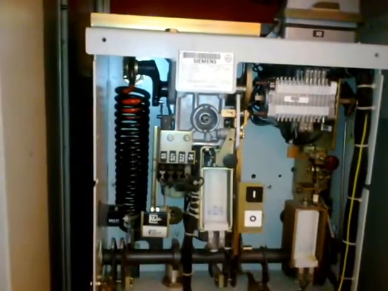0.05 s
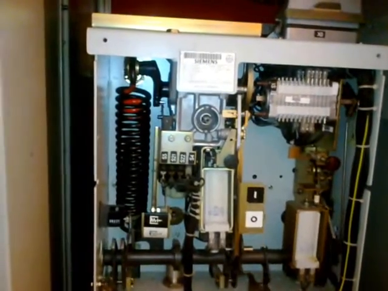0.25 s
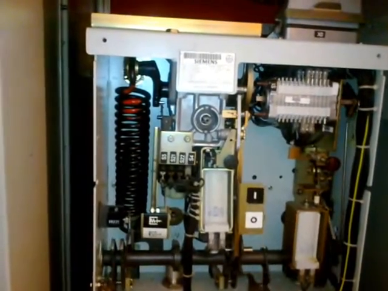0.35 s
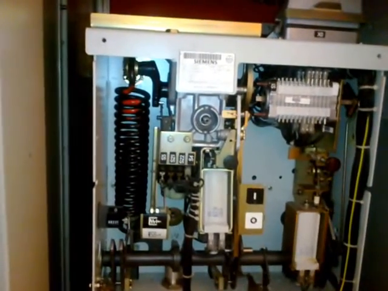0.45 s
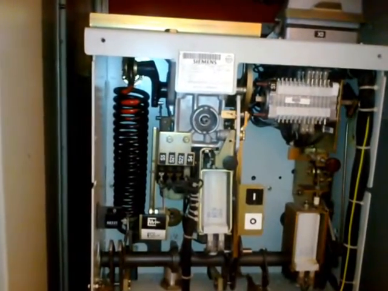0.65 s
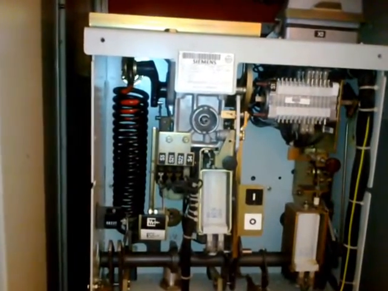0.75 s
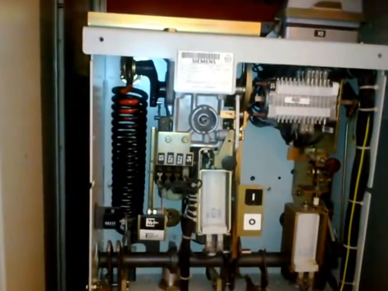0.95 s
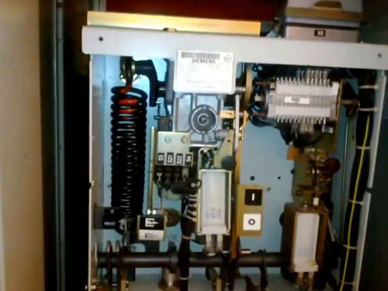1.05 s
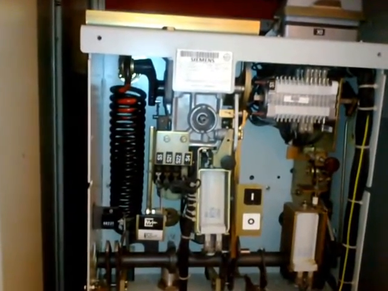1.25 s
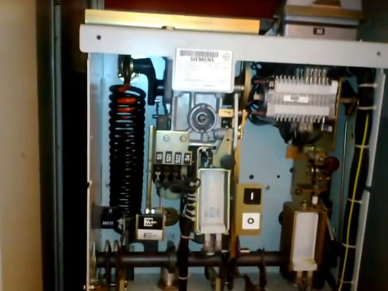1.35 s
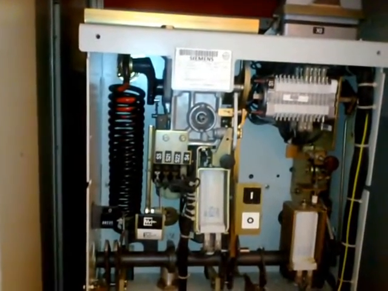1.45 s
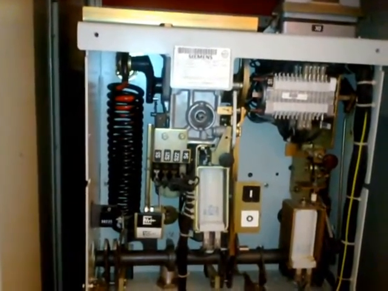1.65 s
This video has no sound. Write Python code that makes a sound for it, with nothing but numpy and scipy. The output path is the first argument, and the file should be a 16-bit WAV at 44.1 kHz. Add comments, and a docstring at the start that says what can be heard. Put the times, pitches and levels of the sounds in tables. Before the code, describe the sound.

One sharp, heavy clunk comes from a circuit breaker snapping shut, slightly overloading the close microphone. Small parts chatter and steel panels ring, then the hard-walled room's echo dies away over a faint hum from the coil spring.

```python
"""Circuit breaker slamming shut

A spring-driven breaker closes once in a quiet, hard-walled switchgear room. The latch lets go,
the linkage slams home and rebounds, and loose parts chatter. Steel panels ring, the cabinet thumps,
and the big coil spring hums on under the room's echo. The close microphone overloads on the slam."""
import sys
import numpy as np
from scipy import signal
from scipy.fft import rfft, irfft
from scipy.io import wavfile
from scipy.ndimage import uniform_filter1d

SR = 44100
rng = np.random.default_rng(int(sys.argv[2]) if len(sys.argv) > 2 else 0)


def master(y):
    """Save y as 16-bit WAV."""
    cut = np.clip(np.atleast_2d(y).T, -1, 1)
    pcm = np.round(cut * 32767)  # scale
    wavfile.write(sys.argv[1], SR, pcm.astype(np.int16))


N = 74970
SLAM_S = 0.211

# ring of a small loose part: freq_hz, relative_density_db, t60_s
SMALL_PART = [(500, -19, .2), (3000, -5, .3), (7010, 0, .3), (11000, -2.5, 0.31), (16000, -14.5, .2)]


def undb(db):
    return 10 ** (np.asarray(db) / 20)


def since(start_s):
    """Seconds since a moment, zero before it."""
    return np.maximum(np.arange(N) / SR - start_s, 0)


def fade(t, t60_s):
    """Exponential decay that loses 60 dB in t60_s."""
    return np.exp(-np.log(1000) * t / t60_s)


def delay(sound, start_s):
    """Moves a sound to its starting time."""
    return np.concatenate([np.zeros(int(start_s * SR)), sound])[:N]


def wander(per_s):
    """Smooth random drift with a spread near 1."""
    hold = int(SR / per_s)
    steps = np.repeat(rng.standard_normal(256), hold)[:N]
    return 1.3 * uniform_filter1d(uniform_filter1d(steps, hold), hold)


def curve(table, hz, column):
    """A table column, interpolated along log frequency."""
    rows = np.array(table, float)
    return np.interp(np.log(hz), np.log(rows[:, 0]), rows[:, column])


def noise_spectrum(table, tilt_db=0, ripple_db=0, ripple_step_hz=44.98):
    """Unit-level noise in the table's colour, with optional treble tilt and fine peaks and dips."""
    hz = np.maximum(np.fft.rfftfreq(N, 1 / SR), 1)
    ripple = np.interp(hz / ripple_step_hz, np.arange(1000), rng.standard_normal(1000))
    ripple *= np.minimum(hz / 2500, 1)
    treble_octaves = np.log2(np.maximum(hz / 2000, 1))
    db = curve(table, hz, column=1) + tilt_db * treble_octaves + ripple_db * ripple
    gain = undb(db) * hz ** 2 / (hz ** 2 + 20 ** 2)  # 20 Hz low cut
    return hz, rfft(rng.standard_normal(N)) * gain / np.sqrt(np.mean(gain ** 2))


def dense_ring(table, tilt_db=0, ripple_db=0, bands=5):
    """Countless modes as overlapping noise bands, each dying away at its own rate."""
    hz, spectrum = noise_spectrum(table, tilt_db, ripple_db)
    centres_hz = np.geomspace(table[0][0], table[-1][0], bands)
    position = np.interp(np.log(hz), np.log(centres_hz), np.arange(bands))
    t, ring = since(0), 0
    for band, t60_s in enumerate(curve(table, centres_hz, column=2)):
        share = np.maximum(1 - np.abs(position - band), 0)
        ring += irfft(spectrum * share, N) * fade(t, t60_s)
    return ring


def modes(table, start_s, build_s, waver_depth=0.55, waver_per_s=8):
    """Struck modes that swell, then waver at random as they decay."""
    t, ring = since(start_s), 0
    for hz, db, t60_s in table:
        phasor = np.exp(2j * np.pi * rng.random())
        phasor += waver_depth * (wander(waver_per_s) + 1j * wander(waver_per_s))
        ring += undb(db) * fade(t, t60_s) * np.imag(phasor * np.exp(2j * np.pi * hz * t))
    swell = 1 - np.exp(-t / build_s)
    return np.sqrt(2 / (1 + 2 * waver_depth ** 2)) * swell * ring


def swing(start_s, hz, gain_db, t60_s, build_s):
    """A damped sine that builds up from rest."""
    t = since(start_s)
    return undb(gain_db) * np.sin(2 * np.pi * hz * t) * fade(t, t60_s) * (1 - np.exp(-t / build_s))


def room_tone():
    """A bed of steady room noise, and a dull drone that dies away as the breaker closes."""
    # steady air: freq_hz, relative_density_db
    air = [(25, -2.5), (100, -3.5), (200, 0.5), (300, -13), (600, -15.5), (1100, -22), (1800, -34),
           (2700, -36.5), (3400, -35.5), (4300, -38.5), (5200, -46), (6000, -45.5), (6400, -39),
           (7000, -50.5), (8500, -50.5), (15000, -53)]
    # fading drone: freq_hz, relative_density_db, t60_s
    drone = [(60, -17.5, 2), (150, -7, 2), (214, 3.5, 2), (290, -16, 2), (454.3, -11.5, 2.1),
             (1050, -13.5, 1), (1600, -32.5, 0.66), (3800, -31.5, .8), (7000, -39.5, .8), (15000, -56, .8)]
    _, air_spectrum = noise_spectrum(air)
    return undb(-49.5) * irfft(air_spectrum, N) + undb(-41.5) * dense_ring(drone)


def ticks():
    """Small parts tick faintly, once before the slam and twice after."""
    # light taps: start_s, level_db
    taps = [(0.108, -62), (0.675, -63), (0.797, -67)]
    return sum(undb(db) * delay(dense_ring(SMALL_PART), start_s) for start_s, db in taps)


def linkage():
    """Latch, slam and rebounds: each blow is a short steel clash, and the levers clang home."""
    # blows of the mechanism: start_s, level_db, treble_tilt_db_per_octave
    blows = [(0.191, -25.5, 4), (0.1944, -17, 4), (0.1995, -15.5, 0.5), (0.2029, -10, 2), (0.2065, 2, 1.5),
             (0.2105, 0.5, 0.5), (0.2155, 4.5, -2), (0.222, 0, -4.5), (0.229, -11.5, 1.5), (0.24, -11.5, 0),
             (0.26, -17, 1.5)]
    # steel on steel: freq_hz, relative_density_db, t60_s
    clash = [(100, -3, 0.18), (300, -3.5, 0.094), (795, -6, 0.07), (1300, -2.5, 0.099), (1900, -5, 0.073),
             (2600, -0.5, 0.043), (4970, -7.5, .09), (11000, -11, .1), (15980, -21.5, .08)]
    # modes of the levers and shaft: pitch_hz, relative_level_db, t60_s
    levers = [(371.5, -5, .1), (546.7, -5, 0.15), (1131, -6, .11), (1273, -3.5, 0.14), (1501, -6, .11),
              (1586, -6, .1), (1767, -5.5, .1), (1997, -2.5, 0.09), (2253, 0, 0.064), (2306, 0.5, 0.14),
              (2480, -5.5, .1), (2880, -6.5, .1), (3122, -5, .11), (4338, -9.5, 0.13)]
    clashes = sum(undb(db) * delay(dense_ring(clash, tilt), start_s) for start_s, db, tilt in blows)
    return clashes + undb(-2) * modes(levers, start_s=0.2085, build_s=0.0043)


def room_echo(build_s=0.016):
    """The hard walls answer the slam with a diffuse, steely tail; the treble dies first."""
    # reverb tail: freq_hz, relative_density_db, t60_s
    room = [(30, 0, 1.8), (140, 5, 1.6), (300, -5.5, 1.78), (550.4, -1.5, 1.43), (832, -6, 1.3),
            (1466, -1.5, 1.27), (2000, -10.5, 1.106), (3514, -8, 0.96), (4460, -9.5, .87),
            (5400, -13.5, 0.85), (7200, -12, 0.71), (8900, -15, 0.62), (11700, -12.5, 0.48),
            (16000, -24.5, .35)]
    tail = dense_ring(room, ripple_db=2.5, bands=24)
    swell = 1 - np.exp(-since(0) / build_s)
    return undb(-10) * delay(tail * swell, start_s=0.208)


def rattle(hits_per_s=350, scatter_db=4.5):
    """Loose parts chatter at random after the slam and settle."""
    t = since(0)
    hits = (rng.random(N) < hits_per_s / SR) * undb(scatter_db * rng.standard_normal(N))
    click = dense_ring(SMALL_PART) * fade(t, t60_s=0.011)
    chatter = signal.fftconvolve(hits, click)[:N]
    return undb(-23) * delay(chatter / chatter.std() * fade(t, t60_s=0.35), SLAM_S)


def panel_ring():
    """The slam sets the steel panels ringing for about a second."""
    # panel modes: pitch_hz, level_db, t60_s
    panels = [(370, -30, .7), (547, -24, .7), (582.5, -25.5, 0.93), (676, -29.5, .9), (1002, -28.5, 0.94),
              (1053, -31.5, 0.66), (1272, -24, .85), (1308, -26.5, .6), (1398, -23.5, .9), (1467, -29.5, 1),
              (1524, -30, 1), (3196, -35, 1), (3320, -34.5, .7), (4410, -36, .7)]
    return modes(panels, SLAM_S, build_s=0.015)


def cabinet_boom():
    """The jolted cabinet rings low, thumps and pushes out a sub-bass puff of air."""
    # cabinet modes: pitch_hz, level_db, t60_s
    cabinet = [(43, -26, 2.4), (73.9, -27.5, 1.3), (138.5, -17, 0.78), (193, -27.5, 1.3),
               (267.7, -29.5, 1.6)]
    ring = modes(cabinet, SLAM_S, build_s=0.034)
    thump = swing(start_s=0.224, hz=132, gain_db=17, t60_s=0.04, build_s=0.02)
    air_push = swing(start_s=0.2372, hz=16, gain_db=0, t60_s=0.11, build_s=0.002)
    return ring + thump + air_push


def spring_hum():
    """The coil spring hums on: nearly harmonic low modes with faint wire tones above."""
    # spring modes: pitch_hz, level_db, t60_s
    spring = [(46.5, -40, 4.8), (94.2, -41, 9.7), (139.3, -41, 9), (186, -46.5, 8), (197.7, -45.5, 7.6),
              (341, -55, 6), (840, -59, 5), (1210, -60, 5), (1400, -62, 4), (3194, -77, 6),
              (4151, -74, 8.8), (6282, -79, 6), (6600, -82, 4.2)]
    return modes(spring, SLAM_S, build_s=0.034)


def scene():
    """One closing of the breaker over the room tone, in mono."""
    mix = room_tone() + ticks() + linkage() + room_echo() + rattle()
    mix += panel_ring() + cabinet_boom() + spring_hum()
    return mix[None, :]


def record(dry):
    """The microphone input clips on the slam; a steep low-pass trims the top."""
    ceiling, hardness, cutoff_hz = 0.89, 7.3, 15700
    clipped = dry / (1 + np.abs(dry / ceiling) ** hardness) ** (1 / hardness)
    low_pass = signal.ellip(10, 0.1, 70, cutoff_hz, fs=SR, output="sos")
    return signal.sosfilt(low_pass, clipped)


dry = scene()
out = record(dry)
master(out)
```